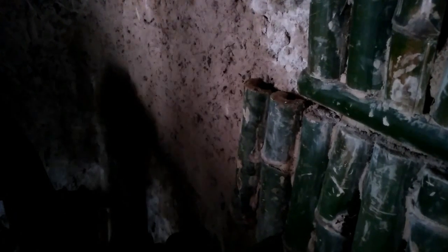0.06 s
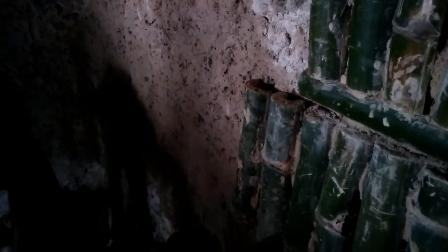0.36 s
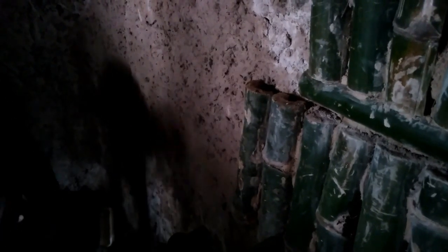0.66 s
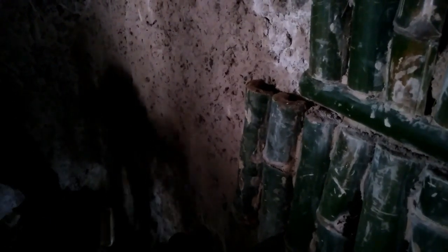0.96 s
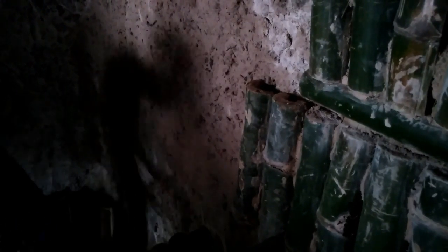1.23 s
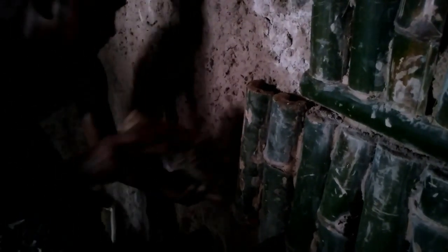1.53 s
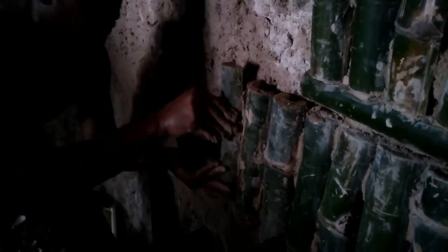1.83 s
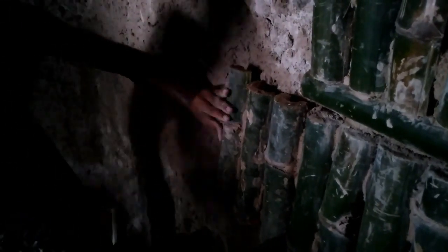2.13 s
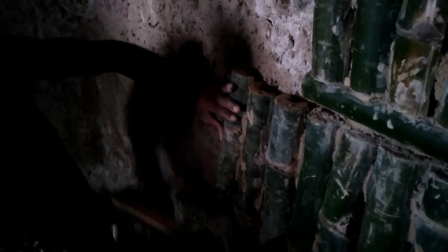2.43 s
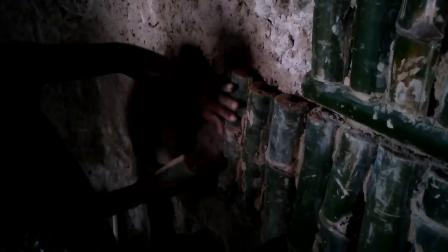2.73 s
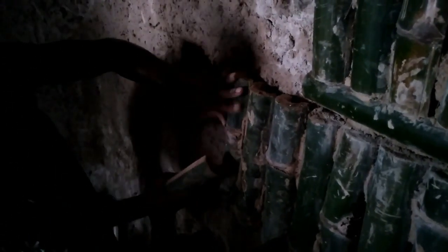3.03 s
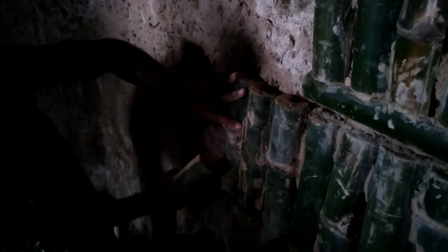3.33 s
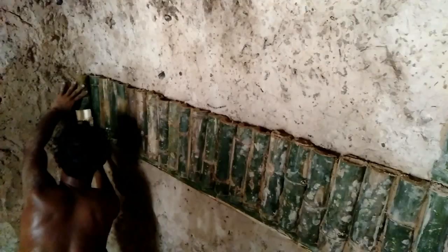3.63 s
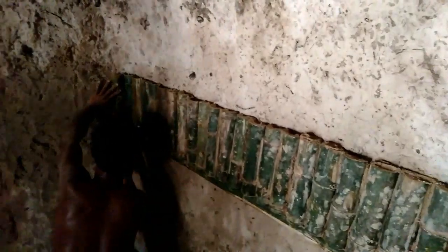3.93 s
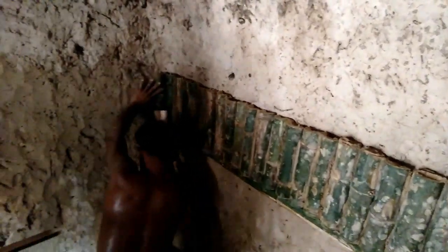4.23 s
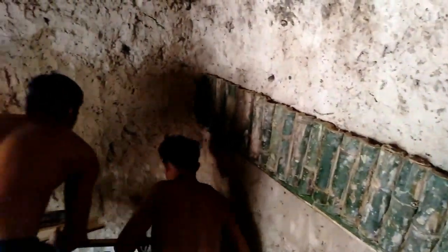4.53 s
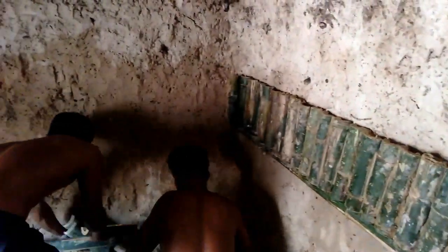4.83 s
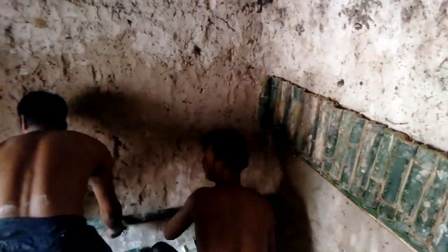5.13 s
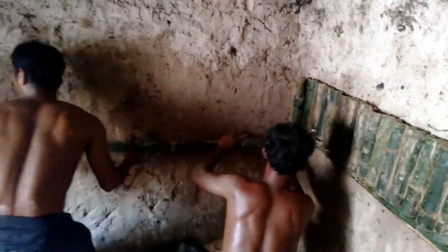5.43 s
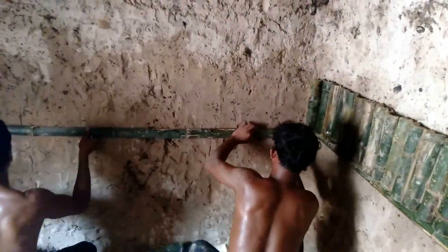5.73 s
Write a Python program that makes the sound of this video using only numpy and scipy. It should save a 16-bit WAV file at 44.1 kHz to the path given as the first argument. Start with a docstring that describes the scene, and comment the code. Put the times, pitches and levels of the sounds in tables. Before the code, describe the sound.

Hands and feet scuff softly on dry soil while a loose pole ticks and a small bird chirps faintly far outside. A bamboo slat is wedged in with a run of quick, dry knocks, then a hollower one is tapped tight. Finally a long pole clacks and scrapes along the ground in short shoves. Everything is heard from one spot in an earthen dug-out, over faint hiss and rumble.

```python
"""Workers line the wall of an earthen dug-out with split green bamboo. First, hands and feet scuff dry
soil, a loose pole ticks and a small bird chirps far outside. From 2.6 s a slat is wedged home with quick
knocks; from 3.6 s another is tapped tight; from 4.4 s the long pole clacks and is shoved along the soil.
Each blow rings the bamboo's modes with a dense burst of reflections; a gate cuts its tail short.
Faint hiss and rumble lie under it all."""
import sys
import numpy as np
from scipy import signal
from scipy.fft import rfft, irfft
from scipy.io import wavfile
from scipy.ndimage import uniform_filter1d

SR = 44100
rng = np.random.default_rng(int(sys.argv[2]) if len(sys.argv) > 2 else 0)


def persist_wave(psi):
    """Save psi, clipped to +-1, as 16-bit WAV."""
    counts = np.round(np.clip(psi, -1, 1) * 32767).astype(np.int16)
    wavfile.write(sys.argv[1], SR, np.atleast_2d(counts).T)


N = 254456

# borders between the five registers thud, hollow, knock, clack, crack (frequency [Hz])
REGISTER_EDGES_HZ = [300, 700, 1500, 4000]


def wedged_slat():
    """Quick knocks wedge a slat home; it rings and thuds against the wall."""
    # (time [s], length [s], level [dB], tilt [dB/register], thud [dB], favoured ring [Hz])
    knocks = [(2.636, .039, -51.5, -2, -46, 1290), (2.703, .038, -34.5, 2, -34.5, 1290),
              (2.773, .031, -57, -1.5, -46, 1000), (2.9095, .039, -29, 3.8, -41, 983),
              (2.977, .035, -45, 3.7, -45, 1000), (3.026, .025, -30, -1, -43.5, 1080),
              (3.155, .031, -22.3, 2.3, -30, 1700), (3.285, .038, -41.5, -3.5, -37, 1290),
              (3.353, .039, -56.5, -2, -43, 990), (3.389, .037, -26.5, -2.5, -32, 1240)]
    # slat resonances (frequency [Hz], level [dB])
    modes = [(92, 4), (135, 9.5), (345, -3.5), (465, 1.5), (641, 1.5), (790, -8.5), (1000, 4.5), (1130, -6),
             (1290, 3.5), (1650, -15.5), (1850, -15.5), (2120, -5), (2410, -21), (2610, -42.5), (2890, -11),
             (3400, -13), (3670, -17.5), (6680, -18), (7550, -20.5)]
    return bamboo(gripped(knocks, firm_rise_s=.0018, t60_s=.14), modes,
                  balance_db=(-3.3, -4, -8.2, -20), spot_db=6.5, favour_db=8.5,
                  detune=.013, chatter_db=2.8, scatter_db=-4, scatter_half_s=.07,
                  damping=.06, stop_s=.0008, linger_db=-34.5, linger_t60_s=.17)


def tapped_slat():
    """A second, hollower slat is tapped tight."""
    # (time [s], length [s], level [dB], tilt [dB/register], thud [dB], favoured ring [Hz])
    taps = [(3.628, .011, -42, -3.5, -36.5, 800), (3.697, .035, -34, 1.5, -33.5, 540),
            (3.764, .037, -45.5, -1, -39.5, 540), (3.833, .081, -52, -3, -45, 760),
            (3.903, .045, -63, -5, -48.5, 905), (4.14, .046, -55.5, -2, -50, 580),
            (4.1995, .011, -26, 1.5, -26, 860), (4.244, .04, -51, -1.5, -46, 510),
            (4.291, .024, -33.5, 3, -31.5, 540), (4.601, .045, -64, -1, -48.5, 513)]
    # slat resonances (frequency [Hz], level [dB])
    modes = [(178, -8), (228, -3), (285, -5.5), (385, -2), (535, 2.5), (625, -3), (790, 4), (875, 7),
             (1340, -3.5), (1620, -23.5), (2100, -6.5), (2950, -13.5), (3260, -9.5), (4260, -24),
             (6420, -16), (6900, -19.5), (7280, -17)]
    return bamboo(gripped(taps, firm_rise_s=.0024, t60_s=.14), modes,
                  balance_db=(-.5, 0, -3, -9), spot_db=4, favour_db=1.5,
                  detune=.026, chatter_db=3.0, scatter_db=1, scatter_half_s=.05,
                  damping=.02, stop_s=.0036, linger_db=-33.5, linger_t60_s=.34)


def loose_pole():
    """The long pole ticks and clacks, each blow with its own rise and decay."""
    # (time [s], length [s], level [dB], tilt [dB/register], thud [dB], favoured ring [Hz],
    #  rise [s], t60 [s])
    clacks = [(.591, .024, -69, 8, -76, 1980, .0065, .19), (.968, .023, -67, 5.5, -68, 1980, .0022, .18),
              (1.277, .018, -70.5, -7, -67, 690, .0024, .23), (3.536, .022, -36.5, 1, -57, 960, .0017, .3),
              (4.447, .039, -37.5, 0, -47, 932, .008, .13), (4.893, .038, -26.3, -5, -45.5, 1150, .014, .1),
              (4.95, .011, -36, 3.3, -42.5, 1980, .004, .17),
              (4.96, .053, -38.5, -1.3, -45, 757, .0027, .47), (5.012, .058, -48, -3, -60, 757, .004, .29)]
    # pole resonances (frequency [Hz], level [dB])
    modes = [(175, -11), (307, -13), (490, -3), (571, -1.5), (757, -4.5), (964, -2), (1098, -2),
             (1215, 2.5), (1346, 4), (1530, -1), (1980, -12.5), (2230, -11.5), (2690, -15.5), (3080, -26)]
    return bamboo(clacks, modes, balance_db=(-8.5, 0, -2.5, -21), spot_db=4, favour_db=12.5,
                  detune=.0082, chatter_db=3.4, scatter_db=-1, scatter_half_s=.025,
                  damping=.17, stop_s=.002, linger_db=-25.5, linger_t60_s=.3)


def gripped(blows, firm_rise_s, t60_s, firm_db=-30):
    """Append rise and t60: blows on a held slat share one decay; harder ones swell faster."""
    return [(s, length_s, db, *rest, firm_rise_s * undb(.3 * (firm_db - db)), t60_s)
            for s, length_s, db, *rest in blows]


def bamboo(blows, modes, balance_db, spot_db, favour_db, detune, chatter_db,
           scatter_db, scatter_half_s, size=16384, **envelope):
    """Each blow rings the modes of one piece; a dense burst of reflections fades sooner."""
    # spectrum of each knock's noisy burst (frequency [Hz], level [dB])
    burst_colour = [(40, -10), (90, -16.5), (200, -5), (500, 0.5), (1100, 6.5), (2000, -5), (3300, -14),
                    (4700, -21), (7200, -16), (9500, -30.5), (13000, -32.5), (16000, -34.5)]
    out, t = np.zeros(N), np.arange(size) / SR
    mode_hz, mode_db = np.transpose(modes)
    for s, length_s, level_db, tilt_db, thud_db, favoured_hz, rise_s, t60_s in blows:
        # grip and strike point change the pitch and share of every mode
        shift, strength, phase = rng.standard_normal((3, len(modes)))
        hz = mode_hz * (1 + detune * shift)
        nearness = np.exp(-(np.log(mode_hz / favoured_hz) / .067) ** 2)
        gain = undb(mode_db + 2 * strength + favour_db * nearness)
        ring = unit(gain @ np.sin(2 * np.pi * (hz[:, None] * t + phase[:, None])))
        chatter = undb(chatter_db * walk(230)[:size])  # against neighbouring pieces
        scatter = colour(rng.standard_normal(size), burst_colour)
        scatter *= undb(scatter_db) / (1 + t / scatter_half_s)
        levels_db = blow_levels(level_db, tilt_db, thud_db, favoured_hz, balance_db, spot_db)
        add(out, s, burst(ring * chatter + scatter, rise_s, length_s, t60_s, levels_db, **envelope))
    return out


def blow_levels(level_db, tilt_db, thud_db, favoured_hz, balance_db, spot_db):
    """Register levels: the wall's thud, then four that hardness tilts; the strike point lifts one."""
    step = np.arange(len(balance_db)) - 1
    struck = step + 2 == np.searchsorted(REGISTER_EDGES_HZ, favoured_hz)
    return [thud_db, *(level_db + np.array(balance_db) + tilt_db * step + spot_db * struck)]


def burst(source, rise_s, length_s, t60_s, levels_db, damping, stop_s, linger_db, linger_t60_s):
    """A sound swells, decays (treble first) and is gated short; a faint tail lingers."""
    t = np.arange(len(source)) / SR
    step = np.arange(len(levels_db))[:, None] - 1
    swell = np.sin(np.pi / 2 * np.minimum(t / max(rise_s, 1e-4), 1)) ** 2
    register_t60_s = max(t60_s, .02) * np.exp(-damping * step)
    decay = undb(-60 * t / register_t60_s)
    gate = .5 - .5 * np.tanh((t - length_s) / stop_s)
    tail = undb(linger_db - 60 * t / linger_t60_s)
    bands = registers(source) * swell * (decay * gate + tail * (1 - gate))
    band_rms = np.sqrt(np.sum(bands ** 2, axis=1, keepdims=True) / (length_s * SR))
    return undb(levels_db) @ (bands / band_rms)


def pole_drag():
    """The pole scrapes along the soil; each shove builds until it sticks."""
    # sliding between shoves (time [s], level [dB])
    slide = [(4.35, -110), (4.46, -64.5), (4.8, -63), (5.18, -62.5), (5.42, -69), (5.77, -71)]
    # (time [s], length [s], end level [dB])
    shoves = [(4.48, .075, -56), (4.625, .1, -51), (4.755, .03, -53), (4.79, .1, -56), (4.92, .06, -53),
              (5.07, .06, -46.5), (5.135, .033, -48.5), (5.27, .03, -60), (5.47, .078, -55),
              (5.61, .07, -61)]
    # scrape spectrum (frequency [Hz], level [dB])
    scrape_colour = [(150, -9), (250, -4), (650, -11), (1250, -1.5), (1800, -1), (3300, -5), (4800, -12.5),
                     (7000, -5.5), (9500, -17), (16000, -16.5)]
    pushes = strokes(shoves, swell_db=7, edge_s=.004)
    return friction(slide, pushes, scrape_colour, spread_db=3.0, slip_hz=88.6, slip_db=3.1)


def scuffs(size=16384):
    """Short rubs and soft bumps on soil; a sharp, dry click sounds at 3.635 s. Longer ones swell and fade
    slower."""
    # (time [s], length [s], level [dB], tilt [dB/register])
    events = [(.278, .043, -70, 4.7), (1.134, .027, -63, 6), (1.505, .055, -74, -6.5),
              (1.988, .01, -68.5, -1), (2.231, .072, -62, -2.3), (2.338, .012, -70, -4.5),
              (2.805, .04, -67, 1), (3.525, .019, -51, -1), (3.555, .033, -58, -1.5),
              (3.635, .003, -47, -1), (3.648, .014, -56, -3), (3.688, .04, -66, -12), (3.955, .04, -68, -4),
              (4.04, .033, -75, -9), (4.359, .031, -72, -8), (4.616, .0065, -55, -1),
              (4.832, .031, -54.5, .5), (4.975, .018, -51, 3.5), (5.588, .025, -53.5, .7)]
    # gritty spectrum with a dull low end (frequency [Hz], level [dB])
    grit_colour = [(45, 8), (110, 6.5), (230, -4.5), (450, -7), (720, -4.5), (1200, 2.5), (2200, 5.5),
                   (3300, -8), (4700, -3), (7200, 4.5), (9500, -5), (16000, -6)]
    # per register, thud to crack (level [dB])
    balance_db = (0, -4, 0, 1, -3)
    out, step = np.zeros(N), np.arange(len(balance_db)) - 2
    for s, length_s, level_db, tilt_db in events:
        grains = colour(grit(size, spread_db=1.9), grit_colour)
        levels_db = level_db + np.array(balance_db) + tilt_db * step
        rise_s, t60_s = .15 * length_s, 8 * length_s
        add(out, s, burst(grains, rise_s, length_s, t60_s, levels_db,
                          damping=.02, stop_s=.0023, linger_db=-23.5, linger_t60_s=.18))
    return out


def rustle():
    """Hands and feet brush lightly over dry soil."""
    # faint rustle bed, which dips during the loud knocks (time [s], level [dB])
    bed = [(0, -77), (1.5, -76), (1.8, -70), (2.3, -72), (2.7, -70), (3.1, -85), (3.5, -77), (3.9, -69),
           (4.1, -73), (4.45, -68), (5.77, -67)]
    # (time [s], length [s], end level [dB])
    brushes = [(0, .07, -65), (.405, .1, -63.5), (.725, .045, -62.5), (1.0, .03, -65), (1.172, .02, -62),
               (1.285, .065, -66), (1.44, .012, -64), (1.658, .015, -63), (1.925, .06, -67.5),
               (2.052, .04, -67), (2.545, .03, -63), (3.57, .03, -60), (4.31, .04, -63)]
    # brushing spectrum (frequency [Hz], level [dB])
    soil_colour = [(200, -2), (600, -4.5), (1200, 0), (2200, 1.5), (4500, -3.5), (7200, 3.5), (9500, -7.5),
                   (13000, -10), (16000, -4.5)]
    pushes = strokes(brushes, swell_db=1, edge_s=.007)
    return friction(bed, pushes, soil_colour, spread_db=2.0, slip_hz=69.6, slip_db=2.6)


def friction(bed, pushes, spectrum, spread_db, slip_hz, slip_db):
    """Soil grains crush in uneven slips: a faint bed plus firmer pushes."""
    times_s, db = np.transpose(bed)
    bed_gain = undb(np.interp(np.arange(N) / SR, times_s, db))
    gain = np.hypot(bed_gain, pushes)
    return colour(grit(N, spread_db), spectrum) * gain * undb(slip_db * walk(slip_hz))


def strokes(rows, swell_db, edge_s):
    """Gain of rubbing strokes: each grips, grows towards its end and lets go."""
    t, gain = np.arange(N) / SR, np.zeros(N)
    for s, length_s, end_db in rows:
        grip = (np.tanh((t - s) / edge_s) - np.tanh((t - s - length_s) / edge_s)) / 2
        remaining = np.clip((s + length_s - t) / length_s, 0, 1)
        gain += grip * undb(end_db - swell_db * remaining)
    return gain


def bird(length_s=.036, start_hz=5150, mean_sweep_hz=600):
    """Thin, wavering chirps from far outside rise and level off."""
    # (time [s], level [dB])
    chirps = [(-.005, -66), (0.684, -65.5), (1.611, -60), (2.127, -64.5), (2.532, -64), (3.354, -66)]
    out, progress = np.zeros(N), np.linspace(0, 1, int(length_s * SR))
    rise = 1 - (1 - progress) ** 1.7
    for s, db in chirps:
        hz = start_hz + mean_sweep_hz * rise * rng.uniform(.7, 1.3)
        hz *= 1 + .018 * walk(540)[:len(progress)]
        tone = np.sin(2 * np.pi * np.cumsum(hz) / SR)
        add(out, s, undb(db) * np.sin(np.pi * progress) * tone)
    return out


def air():
    """Still air: a faint hiss over a low, wavering rumble."""
    # air spectrum (frequency [Hz], level [dB])
    air_colour = [(12, -29.5), (20, -2), (83, -5), (154, -10.5), (234, -22.5), (399, -20), (1220, -21),
                  (1400, -26.5), (2320, -23), (2600, -30.5), (4810, -30), (7310, -32), (9670, -29.5),
                  (14700, -29.5), (16000, -25)]
    rumble_colour = [(10, 6), (25, -13.5), (50, -13), (78, -10), (130, -22), (300, -31.5), (1500, -82)]
    hiss = colour(rng.standard_normal(N), air_colour) * undb(-66.5 + .98 * walk(9.4))
    rumble = colour(rng.standard_normal(N), rumble_colour) * undb(-64.3 + 3.5 * walk(2.4))
    return hiss + rumble


def registers(x):
    """Split into thud, hollow, knock, clack and crack."""
    hz = np.fft.rfftfreq(len(x), 1 / SR)
    lowpasses = [1 / (1 + (hz / edge_hz) ** 16) for edge_hz in REGISTER_EDGES_HZ]
    bandpasses = np.diff(lowpasses, axis=0, prepend=0, append=1)
    return irfft(rfft(x) * bandpasses, len(x))


def colour(x, spectrum):
    """Shape by (frequency [Hz], level [dB]) points; rms 1."""
    hz, db = np.transpose(spectrum)
    bin_hz = np.fft.rfftfreq(len(x), 1 / SR)
    gain = undb(np.interp(np.log(bin_hz + 1), np.log(hz), db))
    return unit(irfft(rfft(x) * gain, len(x)))


def grit(size, spread_db):
    """Dense tiny grains of very unequal strength."""
    return rng.standard_normal(size) * undb(spread_db * np.minimum(rng.exponential(size=size), 6))


def walk(rate_hz):
    """Random steps, smoothed twice; rms 1."""
    hold = max(int(SR / rate_hz), 1)
    steps = np.repeat(rng.standard_normal(N // hold + 1), hold)
    return unit(uniform_filter1d(uniform_filter1d(steps, hold), hold)[:N])


def undb(db):
    """Decibels to gain."""
    return 10 ** (np.asarray(db) / 20)


def unit(x):
    """Scale to rms 1."""
    return x / np.sqrt(np.mean(x ** 2) + 1e-20)


def add(out, s, sound):
    """Mix a sound in at time s."""
    start = max(int(s * SR), 0)
    out[start:start + len(sound)] += sound[:max(N - start, 0)]


def scene():
    """All the work, heard in mono from one spot in the pit."""
    blows = wedged_slat() + tapped_slat() + loose_pole()
    handling = scuffs() + rustle() + pole_drag()
    return (blows + handling + bird() + air())[None]


def record(dry, top_hz=16100):
    """Round the hardest peaks and cut the top."""
    lowpass = signal.ellip(10, .2, 70, top_hz, fs=SR, output="sos")
    return signal.sosfilt(lowpass, np.tanh(dry))


dry = scene()
out = record(dry)
persist_wave(out)
```